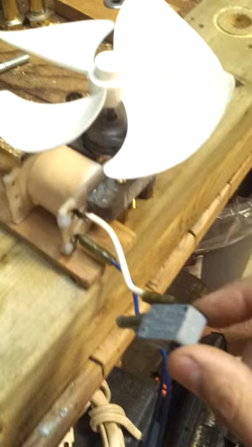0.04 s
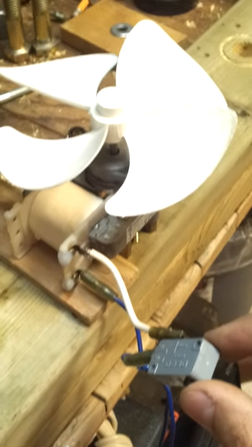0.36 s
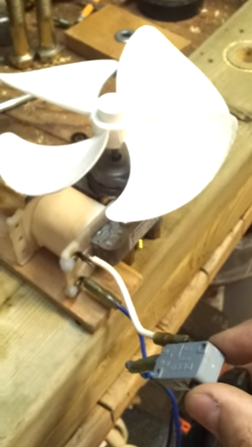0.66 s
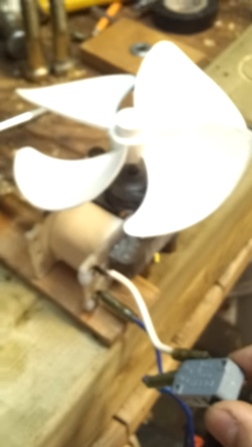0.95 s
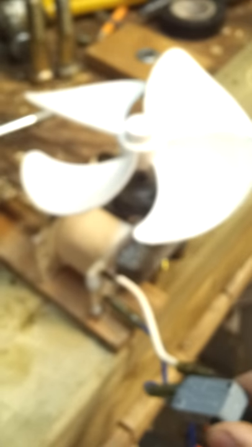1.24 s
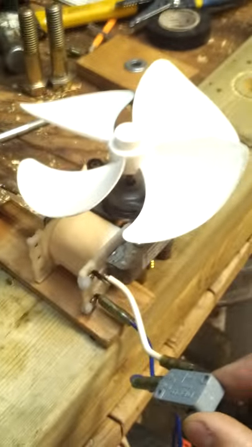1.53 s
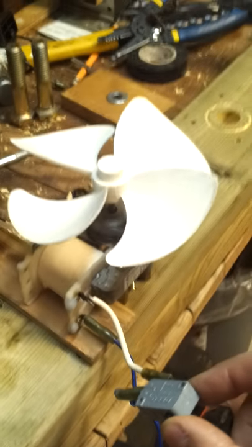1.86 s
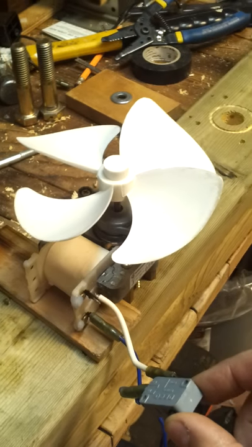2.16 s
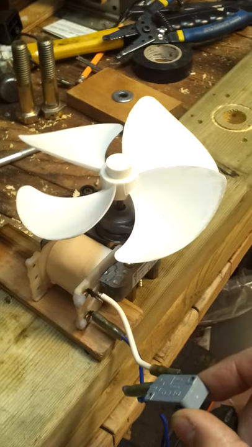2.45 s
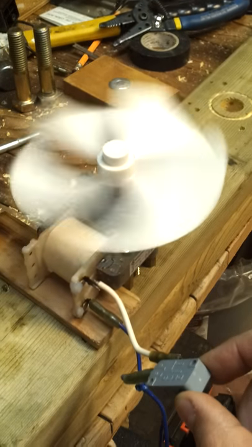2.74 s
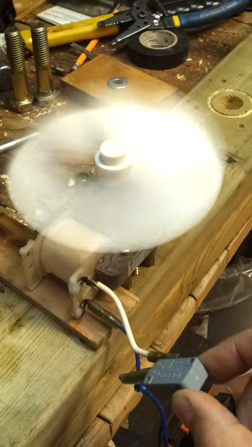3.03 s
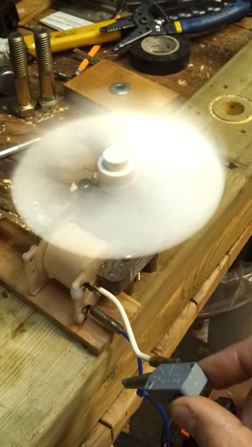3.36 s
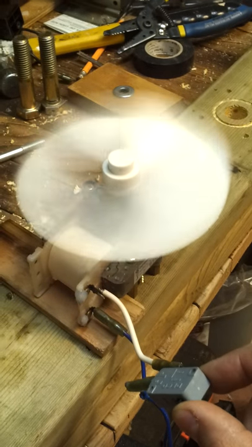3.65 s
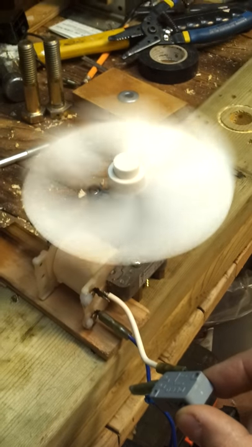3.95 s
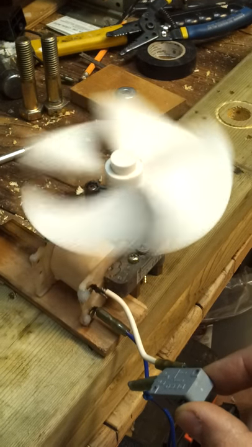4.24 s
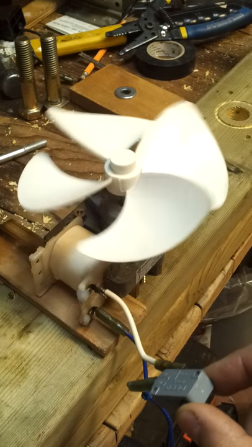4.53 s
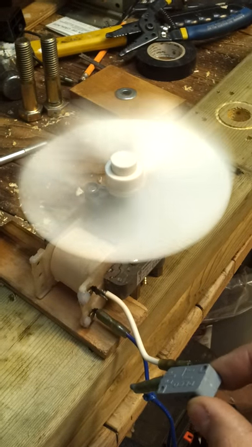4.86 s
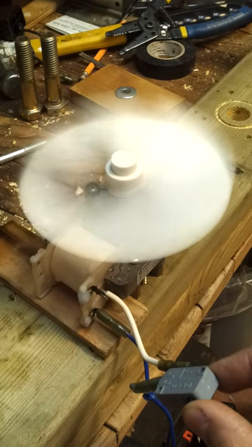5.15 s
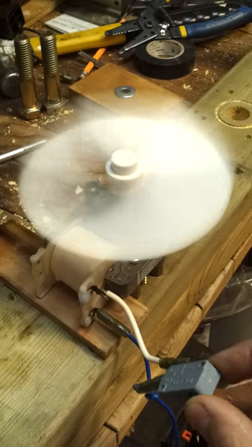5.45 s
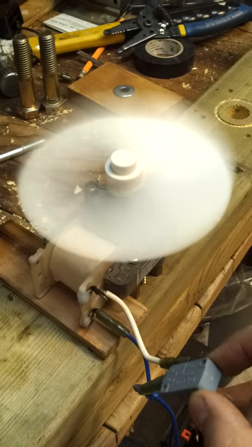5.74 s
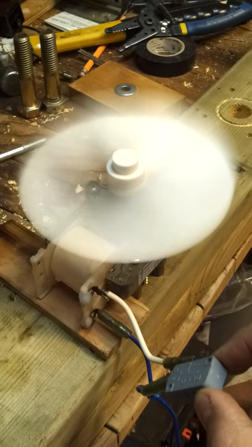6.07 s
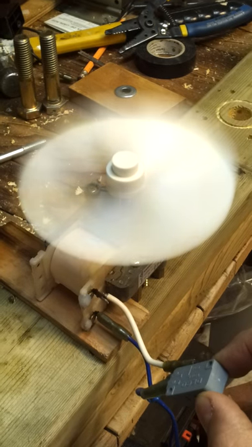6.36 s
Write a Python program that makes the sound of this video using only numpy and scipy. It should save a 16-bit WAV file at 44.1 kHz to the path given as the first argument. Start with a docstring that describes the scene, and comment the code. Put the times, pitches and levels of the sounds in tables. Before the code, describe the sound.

Five crisp switch clicks sound in a quiet workshop with faint ticking and motor hum, then a small fan's soft airy hiss rises.

```python
"""At a workshop bench, a hand-held snap switch is clicked five times, starting and stopping a small fan.
Each click is a train of contact impacts exciting the damped modes of the housing and spring. Left on at
last, the fan gathers speed until its air noise is heard. Two clock escapements tick faintly, a distant
induction motor hums, and a very deep drone swells and fades over the room's air.
The microphone wakes with a soft thump."""
import sys
import numpy as np
from scipy import signal
from scipy.fft import rfft, irfft
from scipy.io import wavfile
from scipy.ndimage import uniform_filter1d, map_coordinates

SR = 44100
rng = np.random.default_rng(int(sys.argv[2]) if len(sys.argv) > 2 else 0)


def master_out(mix):
    """Clip the mix to full scale and print it as 16-bit PCM to the path in sys.argv[1]."""
    frames = np.transpose(np.atleast_2d(mix))
    ceiling = np.clip(frames, -1, 1)
    pcm = np.round(ceiling * 32767).astype(np.int16)
    wavfile.write(sys.argv[1], SR, pcm)


N = 291060
T = np.arange(N) / SR
ROOM_T60_S = 0.27

# snaps: landing_s, relative_level_db, first_flight_s, release_re_landing_db, brightness_db_per_octave
SNAPS = [(2.6937, -11, 0.00031, -4, -1), (3.1341, -9, .00042, -9, 0.8), (4.6361, -9, 0.00035, -12, -1),
         (5.0348, -8.5, 0.000342, -1, 1.2), (5.6124, -8.5, 0.000377, -17, -2.5)]
# modes of the housing and of the spring, closed and open: pitch_hz, bandwidth_hz, left_db, right_db
HOUSING_MODES = [(1900, 1240, -10.5, -20), (2900, 540, -2, -10.5), (3520, 650, -2.5, -14),
                 (4460, 520, -10, -3.5), (5070, 440, -3, -13), (5660, 440, 6, 4.5), (6220, 640, -7, 4.5),
                 (7200, 850, -4, 0), (7910, 480, -12, -1.5), (10230, 1800, -10, -4.5),
                 (12500, 1040, -0.5, -7), (14200, 900, -1, -3)]
CLOSED_SPRING_MODES = [(4750, 360, -4.5, 1), (7800, 88, -11, 4), (8240, 60, -4, 9.5),
                       (9250, 810, -14, -6.5), (12800, 1100, -2.5, -5)]
OPEN_SPRING_MODES = [(6550, 80, -9, -9), (7100, 60, -5, 5), (6800, 290, -13, -11), (7290, 32, -1, 11),
                     (10640, 55, -6, 6), (13500, 50, -3, -2), (13800, 460, -1, -4)]
# early reflections: delay_s, left_db, right_db
REFLECTIONS = [(.0012, -10, -27), (.0037, -33, -13), (.0052, -29, -15), (.0083, -27, -19)]
def switch(gain_db=7.5, left_lag_s=.00003, wall_cut_hz=13000, bench_db=-10.0, room_db=-12.5):
    """Impact excitation: the contact rings housing and spring; bench and room reflect a duller snap."""
    direct, size = np.zeros((2, N)), SR // 5
    for k, (landing_s, db, flight_s, release_db, bright_db) in enumerate(SNAPS):
        force = from_db(db + gain_db) * contact(flight_s, release_db, size)
        spring = OPEN_SPRING_MODES if k % 2 else CLOSED_SPRING_MODES
        snap = resonate(force, HOUSING_MODES, bright_db) + resonate(force, spring, bright_db)
        start = round((landing_s - flight_s) * SR)
        direct[:, start:start + size] += snap
    # the switch lies slightly nearer the microphone's right port
    lag = np.exp(-2j * np.pi * np.fft.rfftfreq(N, 1 / SR) * left_lag_s)
    direct[0] = irfft(rfft(direct[0]) * lag, N)
    dull = signal.sosfilt(signal.butter(2, wall_cut_hz, fs=SR, output="sos"), direct)
    early = sum(np.roll(dull, round(delay_s * SR), axis=1) * from_db([[left_db], [right_db]])
                for delay_s, left_db, right_db in REFLECTIONS)
    bench = from_db(bench_db) * reverberate(dull, t60_s=0.038, delay_s=.001)
    room = from_db(room_db) * reverberate(dull, ROOM_T60_S, delay_s=0.0044)
    return direct + early + bench + room


def contact(flight_s, release_db, size, restitution=.8, bounce_db=-4.5):
    """Inelastic rebound: once released, the contact lands with ever shorter flights and weaker knocks."""
    force = np.zeros(size)
    force[0] = from_db(release_db)
    knocks = np.arange(6)
    landings = np.cumsum(flight_s * restitution ** knocks) * SR
    for landing, db in zip(landings, bounce_db * knocks):
        force[:SR // 100] += from_db(db) * np.sinc(np.arange(SR // 100) - landing)
    return force


# spectrum of the air off the blades: frequency_hz, relative_density_db
BLADE_NOISE = [(60, -91), (160, -78), (400, -88), (800, -87), (1300, -84.5), (2100, -80.5), (2900, -84.5),
               (3700, -89), (5000, -90.5), (7000, -95.5), (9000, -103), (14000, -110)]
def fan(spin_up_s=1.5, coast_s=0.84, exponent=4.7, gain_db=2.5):
    """Aerodynamic noise grows as a steep power of blade speed, so the short runs stay unheard."""
    speed = np.zeros(N)
    for k, snap in enumerate(SNAPS):
        start = round(snap[0] * SR)
        goal, lag_s = (0, coast_s) if k % 2 else (1, spin_up_s)   # each snap toggles the power
        speed[start:] = goal + (speed[start] - goal) * np.exp(-T[:N - start] / lag_s)
    return from_db(gain_db) * (speed / speed.max()) ** exponent * diffuse_noise(BLADE_NOISE)


# escapement timing: first_tick_s, period_s, tock_delay_s
QUICK_BEAT = (0.2037, 0.46834, 0.229)
SLOW_BEAT = (0.2914, 0.53106, 0.2777)
# modes of the clock cases: pitch_hz, bandwidth_hz, left_db, right_db
QUICK_CASE_MODES = [(3960, 1000, -15.5, -23), (5780, 350, -22, -10), (6900, 370, -20, -12),
                    (8600, 650, -36, -22)]
SLOW_CASE_MODES = [(3540, 550, -11, -17), (4680, 550, -13.5, -8.5), (6100, 760, -20, -12),
                   (7530, 190, -24, -4.5), (8170, 400, -24, -17)]
def clock(beat, case_modes, gain_db, rattle_t60_s, room_db, spread_db=0.6):
    """Forced vibration: each beat drives the case with a decaying run of tiny random impacts."""
    force = np.zeros(N)
    for start_s, db in escapement(*beat):
        start = round(start_s * SR)
        size = min(SR // 5, N - start)
        strength = from_db(db + gain_db + spread_db * rng.standard_normal())
        impacts = rng.standard_normal(size) * from_db(-60 * T[:size] / rattle_t60_s)
        force[start:start + size] += strength * impacts / np.linalg.norm(impacts)
    rattle = resonate(force, case_modes)
    return rattle + from_db(room_db) * reverberate(rattle, ROOM_T60_S, delay_s=0.0047)


def escapement(first_tick_s, period_s, tock_delay_s, tock_db=-1.5):
    """Periodic release: a tick and a tock per cycle, unevenly spaced, as rows of start_s, level_db."""
    beats = []
    for tick_s in np.arange(first_tick_s, T[-1], period_s):
        beats += [(tick_s, 0), (tick_s + tock_delay_s, tock_db)]
    return [(start_s, db) for start_s, db in beats if start_s < T[-1]]


# motor partials: shaft_order, sideband_number, relative_level_db, pan_left_db, left_lead_rad
MOTOR_PARTIALS = [(1, 0, -54.0, 6.0, 0.0), (0, 1, -57.0, 5.0, -0.3), (3, 0, -67.0, 5.0, -0.0),
                  (2, 1, -72, 3, -0.2), (0, 2, -66.0, 4.0, -0.5), (3, 1, -68.0, 4.0, -0.0),
                  (1, 2, -70.0, 1.0, -0.0), (6, 0, -72, 2, -0.2), (4, 1, -68.0, 2.0, -0.4),
                  (7, 0, -61.0, -3.0, -0.1), (5, 1, -64.0, 3.0, -0.4), (10, -1, -71, -3, 0.3),
                  (3, 2, -66.0, -1.0, 0.4), (8, 0, -63.0, -4.0, 0.8), (1, 3, -71.0, 2.0, 0.4),
                  (6, 1, -69.0, 2.0, 0.3), (11, -1, -67.0, 4.0, -0.1), (4, 2, -72.0, 3.0, 0.1),
                  (9, 0, -69.0, 0.0, -0.4), (7, 1, -69.0, 10.0, 0.7), (5, 2, -72.0, 7.0, -0.0),
                  (10, 0, -62.0, 8.0, -0.2), (8, 1, -66.0, 5.0, -0.0), (11, 0, -54.0, 5.0, -0.0),
                  (17, 0, -60.0, 6.0, 2.0), (17, 1, -59.0, -0.0, 2.0), (17, 2, -75.0, 10.0, -0.1),
                  (22, 0, -67.0, 13.0, 3.1), (23, 0, -74.0, 9.0, 0.3), (34, 0, -76.0, 9.0, 1.2)]
def motor(shaft_hz=50.463, mains_hz=60, gain_db=-1.03, waver_db=0.48, slip_s=.00008, spread_turns=.55):
    """Modulation: magnetic pull at twice the mains frequency gives the shaft harmonics sidebands."""
    shaft_time = T + slip_s * uniform_filter1d(drift(rate_hz=1.41), size=400)
    hum = np.zeros((2, N))
    for order, sideband, db, pan_db, lead_rad in MOTOR_PARTIALS:
        turns = order * shaft_hz * shaft_time + sideband * 2 * mains_hz * T
        turns += spread_turns * rng.random()   # partly in step, so their beats make the hum flutter
        phase = 2 * np.pi * turns + lead_rad * np.array([[.5], [-.5]])
        rms = from_db(db + gain_db + waver_db * drift(rate_hz=2.92))
        hum += np.sqrt(2) * rms * panned(pan_db) * np.sin(phase)
    return hum


# glide of the drone: time_s, pitch_hz
DRONE_GLIDE = [(1.3, 42), (2.0, 36.5), (2.8, 29.5), (3.5, 28.2), (4.0, 32.6), (4.4, 29.1), (4.6, 29.96),
               (4.82, 27.7), (5.05, 31.1), (5.4, 40)]
def drone(mode_hz=32, bandwidth_hz=3.8, resonance_db=-54.5, pan_db=2.0, fade_s=.15):
    """Resonance: a faint, deep, gliding tone swells whenever its pitch crosses a mode of the room."""
    time_s, pitch_hz = np.transpose(DRONE_GLIDE)
    hz = np.interp(T, time_s, pitch_hz)
    fade = np.clip(np.minimum(T - time_s[0], time_s[-1] - T) / fade_s, 0, 1)
    rms = fade * from_db(resonance_db) / np.hypot(1, 2 * (hz - mode_hz) / bandwidth_hz)
    return np.sqrt(2) * rms * np.sin(2 * np.pi * np.cumsum(hz) / SR) * panned(pan_db)


# spectrum of the room's air: frequency_hz, density_db
AIR_NOISE = [(20, -78.5), (70, -79.5), (150, -81.5), (300, -82), (480, -84), (680, -88.5), (800, -83),
             (1450, -87.5), (2300, -90), (3500, -91.5), (5300, -94), (7300, -96.5), (9000, -97),
             (14500, -99)]
# resonances of the motor's casing: pitch_hz, bandwidth_hz, boost_db
CASING_MODES = [(546, 130, 8), (830, 7.7, 0.5), (1170, 36, 5), (1287, 40, 8), (1595, 36, 6),
                (1850, 25, 3.5), (2043, 36, 9), (2212, 47, 7.5), (2495, 100, 5), (2747, 13, 9),
                (3330, 29, 5), (3570, 89, 3.5)]
def room_air():
    """Resonant colouring: the motor's casing raises peaks in the steady noise of the room."""
    return diffuse_noise(AIR_NOISE, CASING_MODES)


# likeness of left and right: frequency_hz, correlation
COHERENCE = [(50, 0), (270, 0.6), (520, 0.7), (740, 0.32), (1200, 0), (14000, 0)]
# balance of the room sound: frequency_hz, pan_left_db
BALANCE = [(60, 8), (270, 2.5), (600, 2.5), (740, 0.5), (1200, 5), (1900, 0), (2600, 4.5), (3300, 0.5),
           (4400, 1), (6200, -2.5), (7400, -2), (9000, 0.3), (14000, .4)]
def diffuse_noise(spectrum, peaks=()):
    """Spatial coherence: a diffuse field is partly alike on both sides at long wavelengths only."""
    hz = np.arange(N // 2 + 1) * SR / N
    peaks_db = sum(db / (1 + (2 * (hz - centre) / width) ** 2) for centre, width, db in peaks)
    gain = from_db(at_hz(spectrum, hz) + peaks_db) * panned(at_hz(BALANCE, hz))
    coherence = at_hz(COHERENCE, hz)
    mid, side = rfft(rng.standard_normal((2, N)))
    pair = np.sqrt(1 + coherence) * mid + np.sqrt(1 - coherence) * side * [[1], [-1]]
    return irfft(pair * gain, N) * np.sqrt(SR) / 2


def resonate(force, modes, bright_db=0):
    """Modal superposition: damped modes add in alternating polarity, each with its own stereo gains."""
    out = 0
    for k, (hz, width_hz, left_db, right_db) in enumerate(modes):
        radius = np.exp(-np.pi * width_hz / SR)
        numerator = np.array([1, 0, -1]) * (1 - radius ** 2) / 2
        denominator = [1, -2 * radius * np.cos(2 * np.pi * hz / SR), radius ** 2]
        ring = signal.lfilter(numerator, denominator, force + 1e-18)
        tilt_db = bright_db * np.log2(hz / 6000)
        out = out + (-1) ** k * ring * from_db(np.array([[left_db], [right_db]]) + tilt_db)
    return out


def reverberate(sound, t60_s, delay_s):
    """Reverberation: dense reflections of unit energy decay exponentially, different on each side."""
    t = T[:SR // 2]
    tail = rng.standard_normal((2, len(t))) * from_db(-60 * t / t60_s) * (t > delay_s)
    tail /= np.linalg.norm(tail, axis=1, keepdims=True)
    return signal.fftconvolve(sound, tail, axes=1)[:, :N]


def drift(rate_hz):
    """Slow random fluctuation with a spread near 1."""
    knots = rng.standard_normal(200)
    return map_coordinates(knots, [T[::100] * rate_hz + 2], order=3, mode="wrap").repeat(100)[:N]


def panned(pan_db):
    """Constant-power panning: left and right gains of mean power 1."""
    gains = from_db(np.array([[.5], [-.5]]) * pan_db)
    return gains / np.sqrt(np.mean(gains ** 2, axis=0))


def at_hz(points, hz):
    """Interpolation on a log-frequency axis."""
    frequency_hz, value = np.transpose(points)
    return np.interp(np.log(hz + 1e-3), np.log(frequency_hz), value)


def from_db(db):
    """Decibels to amplitude ratio."""
    return 10 ** (np.asarray(db) / 20)


def scene():
    """Superposition: switch and fan close by; clocks, motor, drone and air behind them."""
    quick = clock(QUICK_BEAT, QUICK_CASE_MODES, gain_db=-3.0, rattle_t60_s=0.027, room_db=-1.5)
    slow = clock(SLOW_BEAT, SLOW_CASE_MODES, gain_db=-5.0, rattle_t60_s=0.25, room_db=-2.0)
    return switch() + fan() + quick + slow + motor() + drone() + room_air()


def record(dry):
    """Step response: the microphone wakes with a jump in bias that leaks away; a low-pass cuts the top."""
    wake_s, leak_s, cutoff_hz = 0.1152, 0.044, 14550
    awake = T >= wake_s
    thump = 0.05 * np.exp(-np.maximum(T - wake_s, 0) / leak_s)
    low_pass = signal.ellip(12, .1, 70, cutoff_hz, fs=SR, output="sos")
    return signal.sosfilt(low_pass, awake * (dry + thump))


dry = scene()
out = record(dry)
master_out(out)
```